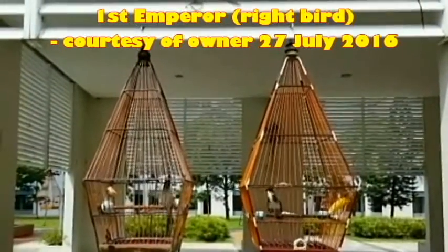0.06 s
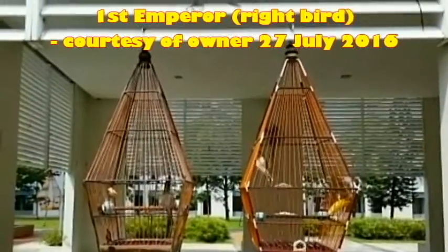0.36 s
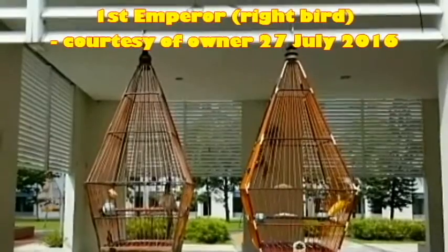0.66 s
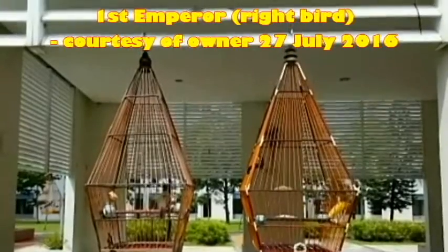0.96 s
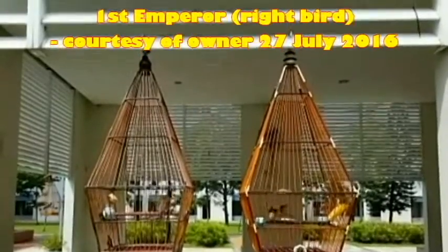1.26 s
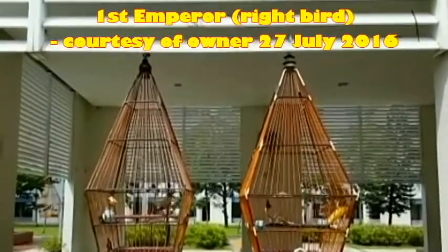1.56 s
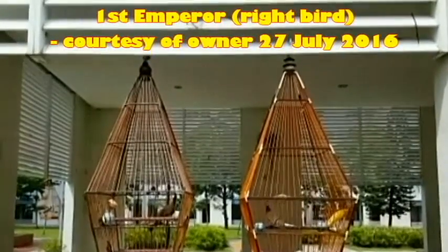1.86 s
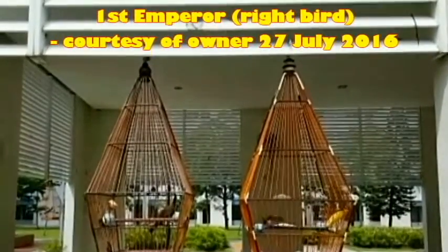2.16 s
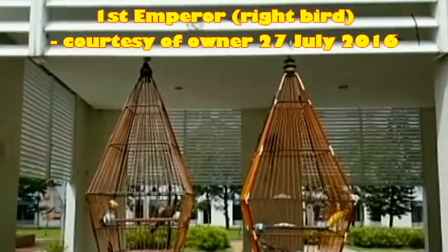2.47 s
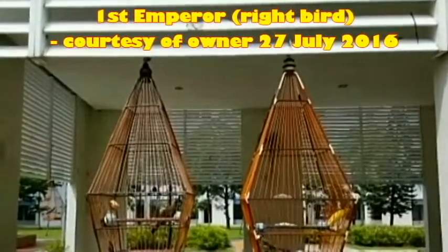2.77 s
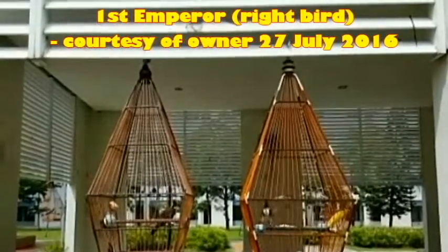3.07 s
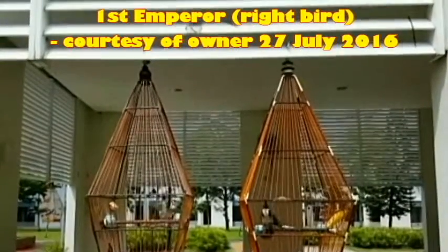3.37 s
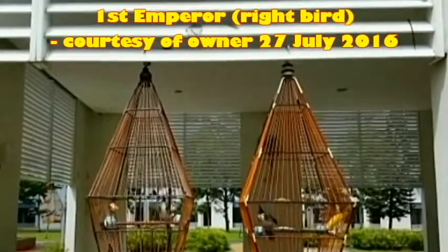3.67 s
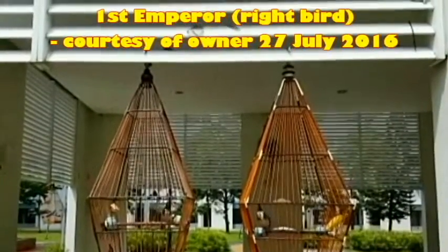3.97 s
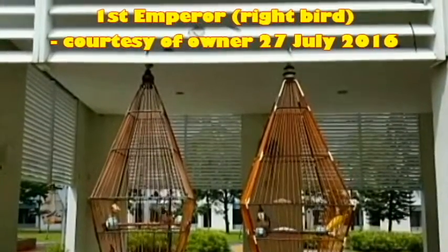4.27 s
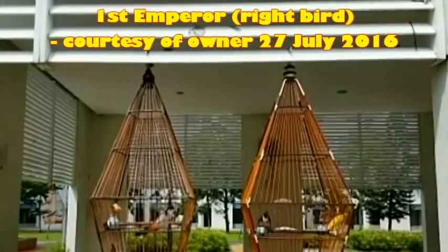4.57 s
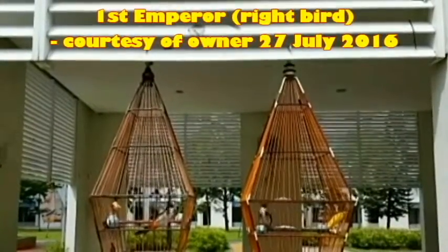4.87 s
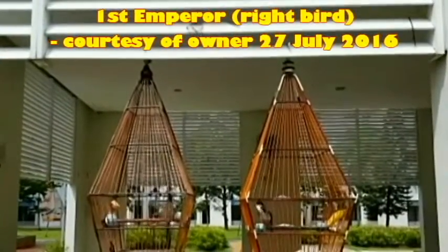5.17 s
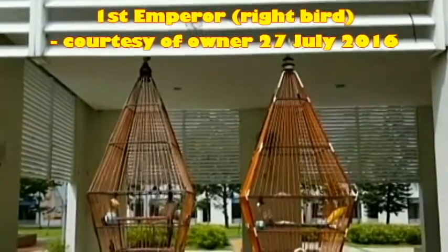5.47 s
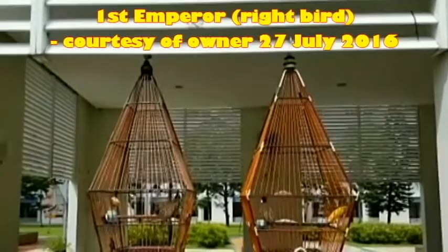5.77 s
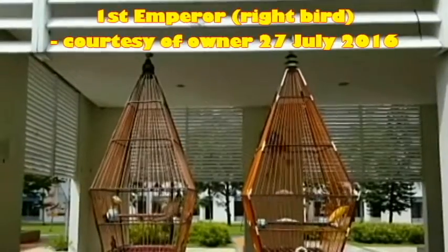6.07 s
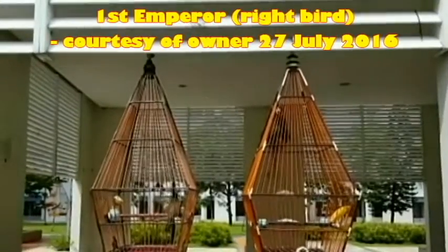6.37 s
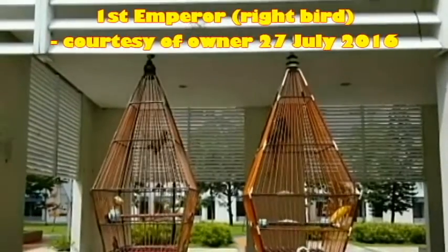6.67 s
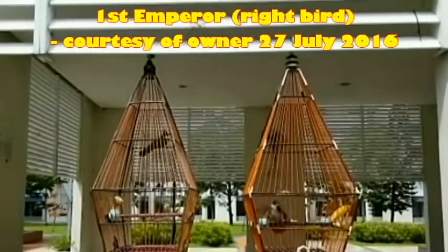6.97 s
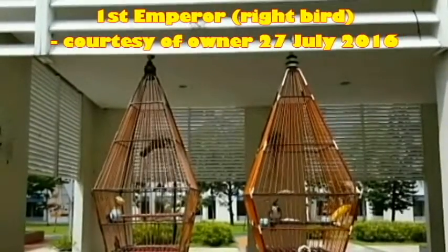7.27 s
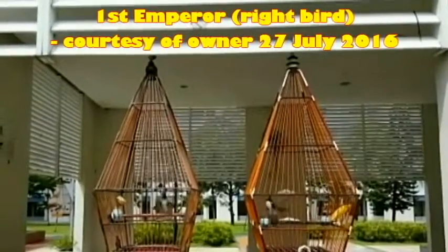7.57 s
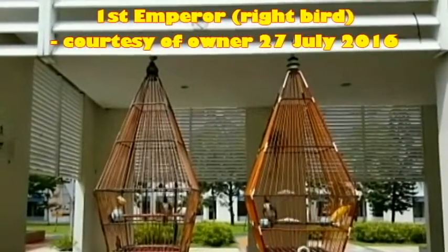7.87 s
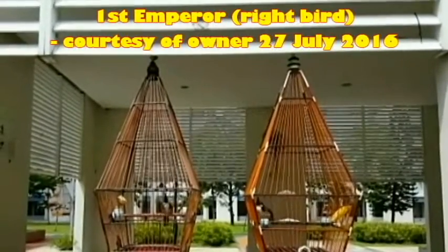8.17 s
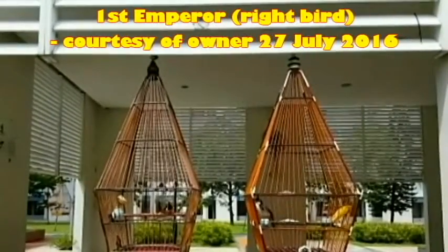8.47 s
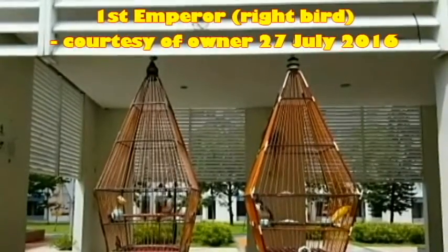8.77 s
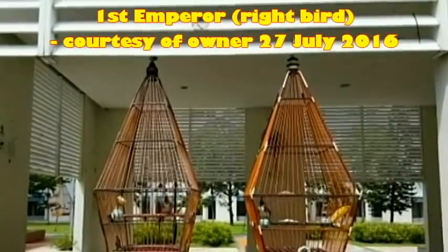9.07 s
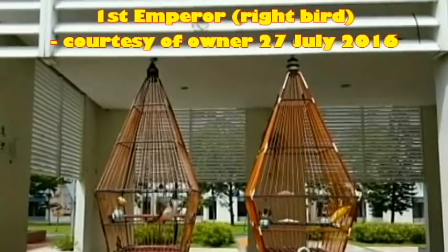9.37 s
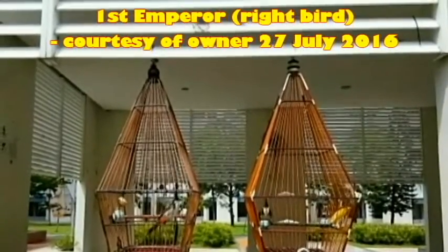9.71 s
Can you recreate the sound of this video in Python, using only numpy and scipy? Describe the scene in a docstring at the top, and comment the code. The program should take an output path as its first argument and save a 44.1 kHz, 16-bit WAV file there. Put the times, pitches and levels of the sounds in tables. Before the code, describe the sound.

Caged songbirds sing nearby under an open porch, their quick bright whistles and buzzy trills ringing briefly off the ceiling and walls. Distant traffic rumbles low throughout, gently rising and falling, with a faint fan hum. A short phrase opens the first half second, followed by sparse chirps, a soft scuff on the cane bars at 0.8 seconds and a faint swell of hiss at 1.5. The song picks up at 2 seconds, leading into five sharp rising chips, slightly to the right, from 2.8 to 3.5. Busy warbling phrases follow with short gaps until about 8.7 seconds, with light cage scuffs around 5, 6.6 and 7.2. A far bird calls faintly and lower from 7 to 7.6 seconds. From 8.8 seconds, six more sharp chips run on almost to the end at 10.

```python
"""Caged bulbuls sing under an open porch. From the start, each syrinx glides through quick whistles
and buzzy trills, prolonged by ceiling and walls, over distant traffic, humming fans and a faint hiss.
Near 0.8 s a bird first scuffs the bars; the hiss swells at 1.5 s; sharp rising chips follow at 2.8 s.
After more song and scuffs, a far bird calls faintly from 7 s, the hiss swells again at 7.8 s,
and a second run of chips, from 8.8 s, leads to the end."""
import sys
import numpy as np
from scipy import signal
from scipy.fft import rfft, irfft, next_fast_len
from scipy.io import wavfile
from scipy.ndimage import uniform_filter1d, minimum_filter1d, map_coordinates

SR = 44100
rng = np.random.default_rng(int(sys.argv[2]) if len(sys.argv) > 2 else 0)


def transcribe(u):
    """Save the signal u as a 16-bit wav file named by the first command-line argument.

    u: samples, shape (n,) or (channels, n), limited to [-1, 1]; the rate is SR.
    q: integer samples, one column per channel.
    """
    v = np.clip(np.atleast_2d(u).T, -1, 1)
    q = np.round(v * 32767).astype(np.int16)
    wavfile.write(sys.argv[1], SR, q)


N = 438354

# Notes: (time [s], length [s], start [Hz], end [Hz], arch [Hz], relative level [dB],
# scattered share [ratio, capped at 1], relative overtones [dB]); a negative arch is a dip.
WHISTLES = [ (0, 0.022, 2580, 2550, 7, -19.5, 0.2, -33.5), (1.359, 0.06, 2262, 2296, -63, -17, .15, -38.5),
            (2.311, .053, 3116, 2802, -76, -7.5, 0.13, -33.5),
            (2.906, 0.05, 3150, 2690, 54, -11.5, 0.3, -18.5),
            (4.304, .115, 2710, 2934, 280, -13.5, 0.4, -34.5),
            (6.241, .058, 2926, 2670, -130, -19.5, 0.4, -38),
            (6.944, 0.04, 2396, 2714, 26.5, -15.5, 0.4, -40),
            (7.791, .1, 1792, 1617, -51.5, -23.5, 0.38, -26),
            (8.908, .044, 3110, 2943, -470, -17, .5, -6.5)]  # drawn-out pure tones
PIPS = [ (0, 0.009, 2110, 2050, 13.5, -15.5, .9, -18.5), (0.228, .016, 3430, 3560, 851, -21, 0.4, -39),
        (0.255, 0.018, 3160, 3490, 96, -11.5, 0.2, -33.5),
        (.294, 0.021, 4860, 3580, 200, -24.5, 0.1, -22.5), (0.845, .012, 4220, 3160, -150, -25.5, .15, -29),
        (1.434, .02, 3300, 3070, -250, -25.5, 0.4, -38), (1.45, .028, 3764, 3384, -30, -15.5, 0.34, -43),
        (1.695, .045, 1800, 1697, -100, -23, 0.63, -34), (2.239, 0.014, 3030, 3360, 702.5, -15, 0.2, -31.5),
        (2.261, .02, 3036, 3740, 223.5, -6.5, 0.2, -34), (2.289, .021, 4250, 3270, 349.5, -17.5, .1, -30),
        (2.61, 0.013, 3500, 3400, 697, -18, 0.4, -31.5), (2.635, 0.029, 3420, 3530, 222, -13, 0.1, -35),
        (2.659, 0.022, 5140, 4460, 27, -29.5, 0.4, -43), (2.883, .018, 4810, 4000, -120, -21, 0.4, -28),
        (2.905, .024, 4450, 4900, -79.5, -17, .32, -24), (4.366, 0.014, 2910, 2490, 29.5, -14.5, .2, -26.5),
        (4.393, .028, 2106, 2260, -38, -18, 0.1, -30), (5.081, .022, 2380, 1950, -76.5, -24.5, .32, -36),
        (5.108, 0.036, 3550, 2890, 53, -18, 0.3, -49), (6.297, .027, 2323, 2253, -15.5, -20, 0.4, -39),
        (7.2, 0.023, 2816, 2760, 56.5, -13, .6, -44), (7.829, 0.024, 3400, 3257, -250, -9, 0.5, -31.5),
        (7.974, 0.035, 1912, 1860, -21, -14.5, 0.45, -38), (8.448, 0.032, 3183, 3414, 62.5, -4, 0.3, -29),
        (8.559, 0.0099, 3140, 3400, 600.5, -16.5, .16, -28.5),
        (8.565, 0.015, 3545, 3060, -100, -10, 0.3, -28), (8.956, .01, 3230, 4060, -50.5, -11.5, 0.2, -16.5),
        (8.961, 0.023, 3050, 2000, 26, -26.5, 0.3, -6.5)]  # short pure flicks
TRILLS = [ (.305, 0.058, 1783, 2107, 144.5, -16.5, 1.03, -23),
          (.308, 0.048, 3590, 2923, -200, -12, .25, -41), (0.394, .06, 2393, 2797, 101, -17, .9, -31.5),
          (0.458, .05, 2465, 1842, 101.5, -18, 0.6, -31), (0.685, 0.074, 2207, 1520, -130, -30, .6, -42),
          (4.579, 0.065, 2838, 2176, 200.5, -16.5, 0.7, -33),
          (4.629, 0.049, 1910, 1876, -15.5, -21, 0.5, -31),
          (4.974, 0.04, 2580, 2467, 30.5, -19.5, 0.4, -48),
          (5.342, 0.051, 2737, 2837, 159.5, -22, .5, -40.5),
          (5.637, 0.03, 3780, 3380, 198.5, -28.5, .5, -26.5),
          (5.825, .028, 3086, 3016, 207, -18.5, 0.5, -27.5), (5.898, 0.048, 2800, 1860, -48, -17, 0.9, -28),
          (5.968, 0.049, 1820, 1773, -22, -21, 0.88, -33.5), (6.8, .15, 3030, 2900, 70, -25.5, .85, -40),
          (6.979, .046, 3260, 3390, 123.5, -17.5, 1.2, -21.5),
          (7.052, .085, 3483, 3275, -17.5, -21.5, 1, -27.5), (7.15, 0.046, 3040, 2996, 31, -15, 0.8, -40),
          (7.217, 0.055, 2504, 2357, 30, -19.5, 0.7, -38), (7.251, .08, 2965, 2985, 19.5, -21.5, 1, -37.5),
          (7.42, 0.037, 3010, 2960, 15, -33, 0.6, -34)]  # trills that crest early and fade
# Notes with the same columns and a last one, (trill rate [Hz]).
UPSLURS = [ (0.155, .045, 1550, 2104, 128.5, -15, 0.5, -32.5, 134),
           (0.195, 0.052, 2350, 3230, 150, -9, 0.48, -32.5, 133.4),
           (0.795, 0.076, 1820, 2480, 33.5, -27.5, 0.3, -41, 99.5),
           (2.192, .05, 2130, 2906, -60, -10.5, 0.07, -34, 138.6),
           (2.553, .055, 1980, 3120, -32, -13, 0.36, -37.5, 139),
           (2.786, .055, 2100, 3007, -30, -9.5, 0.36, -32, 140),
           (3.946, .06, 1850, 3500, 497, -9.5, 0.24, -29, 179.4),
           (4.081, .07, 2035, 3365, 298.5, -12.5, .9, -32, 120),
           (4.138, .052, 1900, 2670, -41, -12.5, .3, -26, 117.3),
           (4.183, 0.041, 2800, 3494, 198, -7.5, 0.4, -28, 113),
           (4.439, 0.059, 1880, 2148, 201.5, -14, 0.7, -32, 101.7),
           (4.495, 0.068, 1950, 2942, 299.5, -9.5, 1, -31.5, 113.2),
           (5.274, 0.0475, 2300, 2855, 248, -13, .3, -37.5, 171),
           (5.514, .056, 1700, 2413, -32.5, -14, 0.4, -29.5, 102.7),
           (5.565, 0.04, 2950, 3180, 83.5, -9, .4, -28.5, 100.8),
           (5.62, .05, 1956, 2506, -17, -15.5, .4, -25, 107.3),
           (5.748, .052, 2700, 3257, 61, -9.5, 0.24, -26.5, 103.2),
           (5.85, 0.05, 2150, 2756, 302.5, -11.5, 0.8, -30, 107.3),
           (6.726, .05, 2200, 2905, 355, -15.5, 0.8, -46, 148),
           (7.083, 0.035, 2000, 2720, -20, -17, 0.7, -39, 108.4),
           (7.358, 0.043, 2330, 3040, 178.5, -9.5, 1, -38.5, 147.7),
           (7.574, 0.065, 1400, 2556, 452, -12.5, 0.7, -32.5, 113.8),
           (7.674, .04, 1650, 2760, 48.5, -13, .6, -28.5, 126.8),
           (7.707, .05, 2840, 3440, 200, -8, 0.6, -29, 130.2),
           (7.888, 0.055, 1810, 2770, 143, -10.5, 1.04, -34.5, 108.5),
           (8.203, 0.054, 2320, 3130, 396.5, -9, 0.31, -34, 130.3),
           (8.627, .066, 1613, 3290, 200.5, -10, 0.18, -29.5, 123),
           (9.898, 0.041, 1456, 2320, -150, -22.5, 0.1, -42, 118.6)]  # rising trills that swell
BUZZES = [ (0.837, 0.03, 3460, 4670, -400, -36, 0.5, -29.5, 110),
          (1.326, 0.057, 4140, 3180, -52.5, -38.5, 0.7, -26, 120),
          (2.081, .051, 3003, 3100, 648, -12.5, 0.25, -42.5, 183.7),
          (2.447, .051, 3430, 3264, 560, -15, 0.3, -30, 188),
          (2.674, .056, 3363, 3180, 403, -9.5, 0.3, -31, 192.5),
          (2.935, 0.014, 4030, 3740, -250, -14, .1, -25, 184),
          (4.946, 0.026, 3490, 4360, 248.5, -22, 0.6, -35, 162.4),
          (5.134, 0.024, 2800, 2300, 99.5, -23, .3, -51, 118.5),
          (5.867, 0.036, 4300, 4570, 249, -35, 0.7, -39, 150),
          (6.184, .064, 3474, 3164, 80.5, -15, 0.25, -38, 105.9)]  # trills with a wide pitch swing
# Low winding warbles, one path each: (time [s], pitch [Hz], relative level [dB])
WARBLES = [
    [(1.578, 2440, -28), (1.587, 2305, -18), (1.591, 3130, -16), (1.598, 2150, -19), (1.624, 1960, -23.5)],
    [(3.66, 1550, -22.5), (3.675, 1950, -20), (3.692, 2070, -16), (3.7, 2590, -12.5), (3.712, 2480, -9),
     (3.735, 2036, -13.5), (3.752, 2030, -16.5), (3.766, 1620, -24)],
    [(3.79, 1650, -22), (3.812, 1877, -29), (3.83, 2303, -19.5), (3.848, 1790, -20), (3.862, 1976, -23),
     (3.878, 1620, -23)],
    [(8.396, 1430, -29), (8.405, 2150, -18), (8.416, 2210, -7), (8.425, 2300, -20), (8.433, 2090, -14.5),
     (8.441, 2150, -9), (8.445, 3310, -10), (8.449, 2640, -10.5)],
]
# Beak resonances acting on the overtones: (frequency [Hz], gain [dB])
BEAK_RESONANCES = [(3500, 7.5), (5000, -7.5), (6600, -6.5), (8000, -6), (9000, -0.5), (10200, 4),
                   (11200, -2.5), (12700, 1.5), (14000, -17.5), (15800, -18)]
# Stereo balance of the phrases: (frequency [Hz], left minus right [dB])
SONG_BALANCE = [(1600, -2), (2300, 0.5), (2900, 0), (3400, -4.5), (4200, -5.5), (6500, -3.5), (9000, 2),
                (13000, 0.5)]

# Reverberation of the porch: (frequency [Hz], time to decay by 60 dB [s])
PORCH_T60 = [(1500, 1.6), (3300, 1.44), (6000, 0.09), (12000, 0.73)]
# Echo from the far wall: (delay [s], relative level [dB])
WALL_ECHOES = [(.072, -10)]
# Share of the sound that the surfaces return: (frequency [Hz], gain [dB])
SURFACE_REFLECTION = [(1500, -3.5), (3500, -1.5), (6000, -5.5), (12000, -9.5)]

# Slow surges of the traffic: (time [s], relative level [dB])
TRAFFIC_LEVEL = [(0.0, -24), (0.3, -28), (0.77, -26), (1.33, -24.5), (2.46, -26.5), (3.32, -32),
                 (3.79, -29), (4.29, -29.5), (5.42, -24), (5.84, -28), (6.53, -26.5), (6.97, -24.5),
                 (8.19, -27), (8.55, -30), (9.03, -30), (9.94, -26.5)]
# Spectra of traffic rumble, traffic wash and hiss: (frequency [Hz], relative density [dB])
RUMBLE_SPECTRUM = [(13, -53), (22, -30), (54, -3), (150, 1), (206, 0.5), (245, -3.5), (290, -1),
                   (399, -10.5), (520, -19.5), (680, -23.5), (1140, -120)]
WASH_SPECTRUM = [(200, -12), (450, 1.5), (700, 1.5), (1300, -5), (2200, -6.5), (3500, -15), (5000, -25.5),
                 (7000, -37.5), (10000, -67.5), (15000, -69)]
HISS_SPECTRUM = [(1500, -7.5), (3500, 5), (5500, 6), (9000, -8), (15000, -26.5)]
# Likeness of the noise in the two channels: (frequency [Hz], correlation [ratio])
COHERENCE = [(40, 1), (180, 0.96), (350, 0.81), (700, 0.18), (1400, 0), (8000, 0.22)]
# Tones of the building fans: (frequency [Hz], level [dB])
FAN_TONES = [(156, -48.5), (294, -40.5)]
# Swells of the hiss: (crest time [s], level [dB], fall to either side [dB/s])
HISS_SWELLS = [(1.501, -43.5, 43), (7.8, -52.5, 5)]

# Hops that brush the cage: (time [s], length [s], level [dB])
HOPS = [(0.817, 0.056, -36), (4.953, 0.035, -29), (5.122, 0.046, -31.5), (6.588, 0.043, -33.5),
        (7.221, 0.043, -27.5)]
# Resonances of the cane bars: (frequency [Hz], relative density [dB])
BAR_SPECTRUM = [(500, -22.5), (1000, -7), (1700, 15), (2400, -2.5), (3300, 9), (4500, -7.5), (7000, -26.5),
                (12000, -43), (15000, -39)]

# Chips: (trill onset [s], trill length [s], start [Hz], end [Hz], relative upsweep level [dB],
# relative overtones [dB])
CHIPS = [(2.845, .043, 3760, 3390, -8.5, -22), (3.042, .044, 3176, 3900, -6.5, -15.5),
         (3.181, .057, 3250, 3890, -8, -17.5), (3.332, 0.051, 3105, 3790, -8.5, -19),
         (3.489, .058, 3080, 3875, -9, -21.5), (8.864, 0.052, 3200, 3507, -10.5, -19.5),
         (9.042, .057, 3210, 3820, -7.5, -17), (9.186, .055, 3100, 3870, -7.5, -17.5),
         (9.328, .059, 3325, 3875, -10, -22.5), (9.491, .056, 3050, 3846, -10, -20.5),
         (9.658, 0.055, 3050, 3903, -14, -23.5)]
# Sweep that opens a chip: (time from trill onset [s], pitch [Hz], relative level [dB])
UPSWEEP = [(-.024, 1617, -21), (-.012, 1764, -4), (-.005, 2006, -6.5), (-.001, 2250, -15),
           (.002, 2850, -22)]
# Trill of a chip: (time [share of length], pitch [share of rise], relative level [dB])
CHIP_CONTOUR = [(0, 0.0078, -4), (.5, 0.399, -3), (.82, .93, 0), (.95, 1.1, -12), (1.05, 1.15, -20.5)]
# Colour of the wide-open beak: (frequency [Hz], gain [dB])
GAPE_RESONANCES = [(4000, 0), (6800, 3), (8300, -9), (10500, -3.5), (13000, 3), (15800, -0.5)]
# Stereo balance of the chipping bird, on the right: (frequency [Hz], left minus right [dB])
CHIP_BALANCE = [(1800, -3.5), (3200, -2.5), (4100, -9), (5500, -11.5), (8500, 5), (13000, -1)]

# Glides of a distant bird: (time [s], length [s], start [Hz], end [Hz], level [dB])
FAR_CALLS = [(7.04, 0.041, 1684, 1340, -33), (7.217, 0.041, 1444, 1980, -34.5),
             (7.298, 0.061, 1620, 1320, -33), (7.408, 0.077, 1383, 1166, -35.5),
             (7.501, 0.062, 1690, 1410, -33), (7.597, 0.04, 1414, 1100, -32)]


def amp(db):
    """Amplitude ratio of a level in decibels."""
    return 10 ** (np.asarray(db) / 20)


def unit(x):
    """Normalisation to an rms of 1."""
    return x / np.sqrt(np.mean(x ** 2) + 1e-20)


def along(points, hz):
    """Interpolation on a logarithmic frequency axis."""
    knots_hz, values = np.transpose(points)
    return np.interp(np.log(hz + 1), np.log(knots_hz + 1), values)


def curves(rows, t):
    """Linear interpolation of each column against the first, time."""
    times, *columns = np.transpose(rows)
    return [np.interp(t, times, column) for column in columns]


def wobble(rate, size):
    """Smooth random modulation with `rate` knots a second."""
    return map_coordinates(rng.standard_normal(int(size * rate / SR) + 4), [np.arange(size) * rate / SR])


def filtered(x, response):
    """Linear filtering: the spectrum times a frequency response."""
    size = next_fast_len(N + SR // 4)
    return irfft(rfft(x, size) * response(np.fft.rfftfreq(size, 1 / SR)), size)[..., :N]


def add(track, s, sound):
    """Superposition of a sound on a track at s seconds."""
    start = max(0, round(s * SR))
    part = sound[:, :max(0, N - start)]
    track[:, start:start + part.shape[1]] += part


def diffuse_noise(spectrum):
    """A diffuse field of rms 1: long wavelengths reach both sides alike."""
    def response(hz):
        angle = np.arccos(np.clip(along(COHERENCE, hz), -1, 1)) / 2
        return amp(along(spectrum, hz)) * [np.cos(angle), np.sin(angle)]
    mid, side = filtered(rng.standard_normal((2, N)), response)
    return unit(np.array([mid + side, mid - side]))


def syrinx(path, overtones_db, trill_hz=0, depth_hz=0, octave_db=-42, base_db=0, taper=0.56,
           rolloff_db=2.2, edge_s=0.00385, jitter=0.018, throb_db=2.5, flutter_db=2.5):
    """Source and filter: a trill modulates a tone's pitch and level; the beak shapes its overtones."""
    start, end = path[0][0], path[-1][0]
    t = np.arange(start - edge_s / 2, max(end, start + edge_s) + edge_s / 2, 1 / SR)
    size = len(t)
    hz, db = uniform_filter1d(np.array(curves(path, t)), size=130, axis=1)
    cycle = 2 * np.pi * np.cumsum(trill_hz * (1 + 0.065 * wobble(70, size))) / SR
    swing_hz = depth_hz * (1 - taper * np.linspace(0, 1, size) ** 2)
    hz = hz * (1 + jitter * wobble(697.8, size)) + swing_hz * np.sin(cycle)
    pulse_db = throb_db * np.minimum(swing_hz / 250, 1) * np.sin(cycle + 1)  # loudest on the way up
    pulse = unit(amp(pulse_db + flutter_db * wobble(129.8, size)))
    fade = np.sin(np.pi / 2 * np.clip(np.minimum(t - t[0], t[-1] - t) / edge_s, 0, 1)) ** 2
    phase = 2 * np.pi * np.cumsum(hz) / SR
    tone = amp(base_db) * np.sin(phase) + amp(octave_db) * np.sin(2 * phase)
    for k in range(2, 8):
        level = overtones_db + along(BEAK_RESONANCES, k * hz) - rolloff_db * (k - 2)
        level += 3 * wobble(300, size)
        rasp = wobble(1100, size)  # phase noise makes the overtone hoarse
        tone += amp(level) * (k * hz < SR / 2) * np.sin(k * phase + rasp)
    return np.sqrt(2) * tone * amp(db) * pulse * fade


def scatter(tone, share, t60, left_db=0, build_s=0.00064, clump_db=5):
    """Scattering: direct sound plus dense ceiling reflections, new for each turn of the head."""
    t = np.arange(SR // 6) / SR
    bright = rng.standard_normal((2, len(t))) * amp(clump_db * wobble(300, len(t)))
    dull = signal.sosfilt(signal.butter(2, 5000, fs=SR, output="sos"), bright)
    spray = dull + (bright - dull) * np.exp(-t / 0.037)  # late bounces have lost their treble
    spray *= amp(-60 * t / t60) * (1 - np.exp(-t / build_s))
    reflected = signal.fftconvolve(tone[None], spray, axes=1)
    reflected *= np.linalg.norm(tone) / np.linalg.norm(reflected, axis=1, keepdims=True)
    direct = np.pad(tone, (0, len(t) - 1))
    direct = np.array([np.roll(direct, 2), direct])  # arrives on the right first
    both = np.sqrt(1 - share) * direct + np.sqrt(share) * reflected
    both *= np.linalg.norm(tone) / np.linalg.norm(both, axis=1, keepdims=True)
    return both * amp([[left_db / 2], [-left_db / 2]])


def note(row, crest, onset_db, close_db, trill_hz=0, depth_hz=0, lead_in=0.1, lead_in_db=0):
    """Directivity: an arched glide sung away from the listener arrives more scattered and rougher."""
    s, length, start_hz, end_hz, arch_hz, db, share, overtones_db = row
    away = np.clip(share, 0, 1)
    u = np.linspace(0, 1, 33)  # share of the length, as are crest and lead_in
    hz = start_hz + (end_hz - start_hz) * u + arch_hz * (1 - (2 * u - 1) ** 2)
    rise_db = onset_db * (1 - u / crest) ** 2
    fall_db = close_db * ((u - crest) / (1 - crest)) ** 2
    swell_db = np.where(u < crest, rise_db, fall_db) + lead_in_db * np.clip((lead_in - u) * 20, 0, 1)
    path = np.column_stack([s + length * u, hz, db + swell_db])
    tone = syrinx(path, overtones_db, trill_hz, depth_hz, jitter=0.012 + 0.018 * away, throb_db=4)
    return scatter(tone, away, t60=0.043 + 0.28 * away)


def phrases(lead_s=0.002):
    """Frequency and amplitude modulation: each kind of note has its own trill depth and swell."""
    song = np.zeros((2, N))
    for *row, trill_hz in UPSLURS:
        upslur = note(row, crest=0.8, onset_db=-7, close_db=-3.5, trill_hz=trill_hz, depth_hz=202,
                      lead_in=0.26, lead_in_db=-5)
        add(song, row[0] - lead_s, upslur)
    for row in TRILLS:
        trill = note(row, crest=0.4, onset_db=-0.5, close_db=-3.5, trill_hz=110.4, depth_hz=160)
        add(song, row[0] - lead_s, trill)
    for *row, trill_hz in BUZZES:
        buzz = note(row, crest=0.4, onset_db=-4, close_db=-2.5, trill_hz=trill_hz, depth_hz=408)
        add(song, row[0] - lead_s, buzz)
    for row in WHISTLES:
        add(song, row[0] - lead_s, note(row, crest=0.91, onset_db=-8.5, close_db=-2))
    for row in PIPS:
        add(song, row[0] - lead_s, note(row, crest=0.41, onset_db=-8.5, close_db=-7))
    for path in WARBLES:
        warble = syrinx(path, overtones_db=-35.5, jitter=0.016)
        add(song, path[0][0] - lead_s, scatter(warble, share=0.17, t60=0.064, left_db=1.5))
    return filtered(song, lambda hz: amp(np.outer([.5, -.5], along(SONG_BALANCE, hz))))


def porch(song, tail_db=-11.5):
    """Reverberation: a wall echo and a diffuse tail whose treble dies first."""
    hz, t, noise = signal.stft(rng.standard_normal((2, SR)), SR, nperseg=256)
    envelope = amp(-60 * t / along(PORCH_T60, hz)[:, None]) * (1 - np.exp(-t / 0.034))
    _, tail = signal.istft(noise * envelope, SR, nperseg=256)
    tail *= amp(tail_db) / np.linalg.norm(tail[0])
    t = np.arange(SR // 100) / SR
    for delay, db in WALL_ECHOES:
        slap = rng.standard_normal((2, len(t))) * np.exp(-t / 0.0031)
        add(tail, delay, amp(db) * slap / np.linalg.norm(slap[0]))
    returned = filtered(song.mean(0), lambda hz: amp(along(SURFACE_REFLECTION, hz)))
    return signal.fftconvolve(returned[None], tail, axes=1)[:, :N]


def traffic():
    """Common modulation: one traffic level drives a low rumble and a higher wash of noise."""
    level_db, = curves(TRAFFIC_LEVEL, np.arange(N) / SR)
    surge_db = level_db - level_db.mean()
    rumble = amp(surge_db + 2) * diffuse_noise(RUMBLE_SPECTRUM)
    wash = amp(0.91 * surge_db - 5) * diffuse_noise(WASH_SPECTRUM)
    return amp(level_db.mean()) * (rumble + wash)


def fans(waver_db=2.5, drift_hz=2.477):
    """Tonal radiation: building fans hum, unsteady in level and frequency."""
    hum = np.zeros(N)
    for hz, db in FAN_TONES:
        rms = amp(db + waver_db * wobble(5.4, N))
        phase = 2 * np.pi * np.cumsum(hz + drift_hz * wobble(8, N)) / SR
        hum += rms * np.sqrt(2) * np.sin(phase)
    return hum


def hiss(floor_db=-74.5):
    """Exponential growth and decay: soft treble noise swells above a steady floor."""
    t = np.arange(N) / SR
    swells = sum(amp(db - fall * np.abs(t - s)) for s, db, fall in HISS_SWELLS)
    return (amp(floor_db) + swells) * diffuse_noise(HISS_SPECTRUM)


def hops(grain_db=6):
    """Friction: feathers and claws excite the cane bars in short, grainy bursts."""
    scuffs = np.zeros((2, N))
    for s, length, db in HOPS:
        size = int(length * SR)
        burst = unit(np.hanning(size) * amp(grain_db * wobble(250, size)))
        add(scuffs, s, amp(db) * burst[None])
    return scuffs * diffuse_noise(BAR_SPECTRUM)


def chips(trill_db=-11, lead_s=0.002):
    """Frequency modulation: an upsweep, strongest at its octave, then a trill narrowing to a whistle."""
    song = np.zeros((2, N))
    for s, length, start_hz, end_hz, sweep_db, overtones_db in CHIPS:
        path = np.array(UPSWEEP) + [s, 0, sweep_db]
        sweep = syrinx(path, overtones_db - 1.5, octave_db=-3, base_db=-15, rolloff_db=2.5, jitter=0.009)
        add(song, path[0][0] - lead_s, scatter(sweep, share=0.35, t60=0.097, left_db=4, clump_db=3))
        path = [(s + when * length, start_hz + rise * (end_hz - start_hz), trill_db + db)
                for when, rise, db in CHIP_CONTOUR]
        trill_hz = 195 * (1 + 0.045 * rng.standard_normal())
        trill = syrinx(path, overtones_db + 3.5, trill_hz, depth_hz=365, taper=0.86, rolloff_db=0.5,
                       throb_db=4.5, flutter_db=1)
        add(song, s - lead_s, scatter(trill, share=0.37, t60=0.05, build_s=0.0011, clump_db=4))
    return filtered(song, lambda hz: amp(along(GAPE_RESONANCES, hz)
                                         + np.outer([.5, -.5], along(CHIP_BALANCE, hz))))


def far_calls():
    """Propagation over distance: another bird's low glides arrive faint and mostly scattered."""
    song = np.zeros((2, N))
    for s, length, start_hz, end_hz, db in FAR_CALLS:
        glide = syrinx([(s, start_hz, db), (s + length, end_hz, db)], overtones_db=-38, edge_s=0.012)
        add(song, s, scatter(glide, share=0.58, t60=0.18))
    return song


def scene():
    """Superposition of the birds, their reverberation and the town around them."""
    birds = phrases() + chips() + far_calls() + hops()
    return birds + porch(birds) + traffic() + fans() + hiss()


def record(dry, ceiling=0.95, top_hz=15800):
    """Peak and band limiting: a smoothed gain holds the loudest peaks, and the top treble is cut."""
    needed = np.minimum(1, ceiling / (np.abs(dry).max(0) + 1e-9))
    gain = uniform_filter1d(minimum_filter1d(needed, size=441), size=441)  # 10 ms windows
    return filtered(dry * gain, lambda hz: hz < top_hz)


dry = scene()
out = record(dry)
transcribe(out)
```